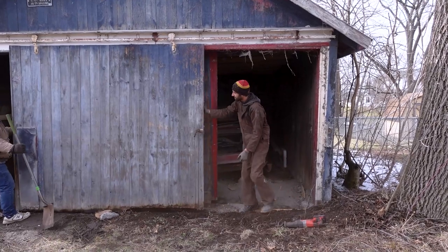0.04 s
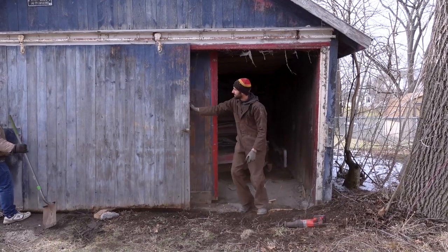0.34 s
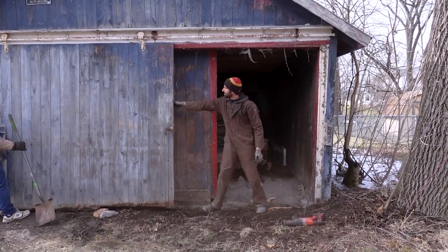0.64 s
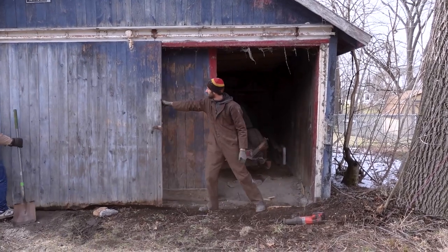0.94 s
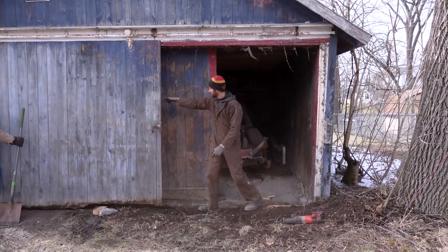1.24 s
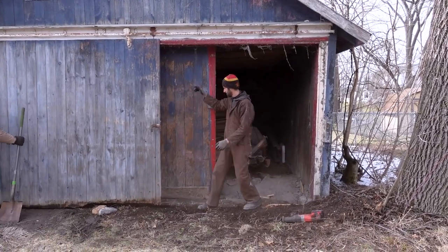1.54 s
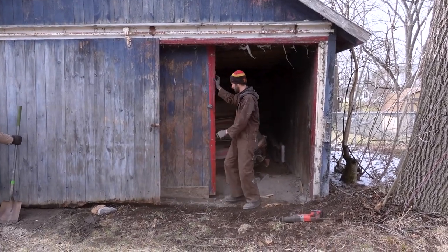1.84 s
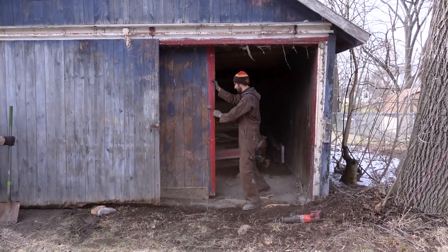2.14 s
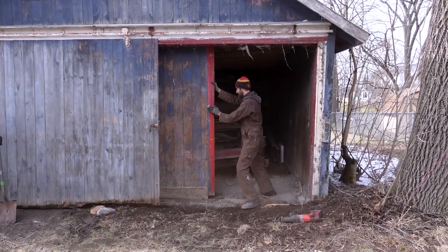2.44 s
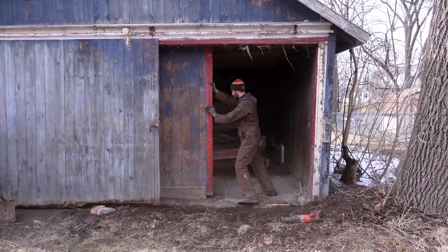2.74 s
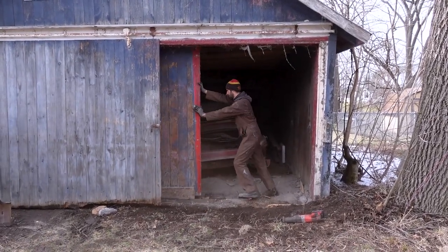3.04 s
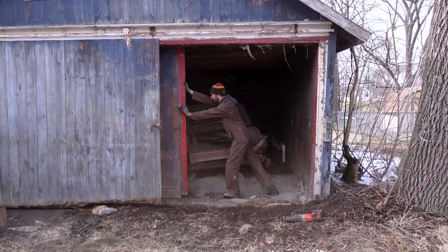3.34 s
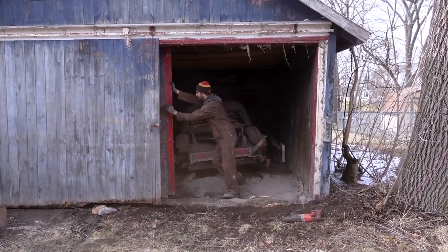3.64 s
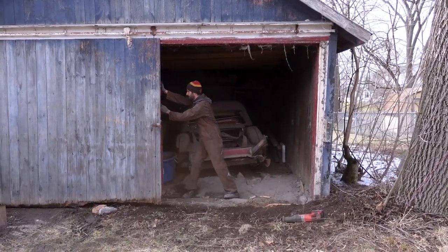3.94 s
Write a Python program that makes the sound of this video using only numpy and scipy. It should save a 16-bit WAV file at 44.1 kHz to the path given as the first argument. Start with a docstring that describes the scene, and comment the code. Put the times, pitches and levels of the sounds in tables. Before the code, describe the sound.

A heavy wooden barn door slides along its track, rumbling and scraping, its steel hangers clattering as it slows. After a pause with faint boot scuffs, it judders on and knocks against its stop, over a faint outdoor hum.

```python
"""Over a distant outdoor hum, a heavy plank barn door is pulled along its overhead track: the rollers
rumble through the booming planks and grind over rust, and the wood rasps on the wall. As the door
coasts to rest, its steel hangers clatter. In the pause, boots shift on the dirt and clothes swish.
Then the door is pushed on, juddering by stick-slip friction, until it knocks on its stop."""
import sys
import numpy as np
from scipy import signal
from scipy.fft import rfft, irfft
from scipy.io import wavfile
from scipy.ndimage import uniform_filter1d

SR = 44100
rng = np.random.default_rng(int(sys.argv[2]) if len(sys.argv) > 2 else 0)


def transcribe(signal):
    """Save signal, clipped to [-1, 1], as a 16-bit WAV file at the path in sys.argv[1]."""
    frames = np.atleast_2d(signal).T
    limited = np.clip(frames, -1, 1)
    pcm = np.round(limited * 32767).astype(np.int16)
    wavfile.write(sys.argv[1], SR, pcm)


N = 176400
T = np.arange(N) / SR


def amp(db):
    """Amplitude ratio of a level in decibels."""
    return 10 ** (np.asarray(db) / 20)


def unit(x):
    """Normalisation to rms 1."""
    return x / np.sqrt(np.mean(x ** 2) + 1e-20)


def read(points, hz):
    """Interpolation on a log-frequency axis."""
    f, value = np.transpose(points)
    return np.interp(np.log(hz + 1), np.log(f + 1), value)


def add(mix, s, sound):
    """Superposition of a sound starting at time s."""
    part = mix[max(0, round(s * SR)):][:len(sound)]
    part += sound[:len(part)]


def through(x, response):
    """Convolution with an impulse response."""
    return signal.fftconvolve(x, response)[:len(x)]


def colour(x, spectrum, size=8192):
    """Minimum-phase filtering to the given spectrum."""
    log_gain = np.log(amp(read(spectrum, abs(np.fft.fftfreq(size, 1 / SR)))))
    response = np.fft.ifft(np.exp(np.conj(signal.hilbert(log_gain)))).real
    return through(x, response[:size // 2])


def shelf(x, db, hz=1750):
    """First-order shelving: the treble above hz changes by db."""
    low = signal.lfilter(*signal.butter(1, hz, fs=SR), x)
    return low + amp(db) * (x - low)


def wander(hz):
    """Random fluctuation of rms 1, low-passed at hz."""
    rolloff = 1 + (np.fft.rfftfreq(N, 1 / SR) / hz) ** 4
    return unit(irfft(rfft(rng.standard_normal(N)) / rolloff, N))


def clicks(per_s, spread_db):
    """Shot noise: random tiny impacts, a few of them large."""
    size = amp(spread_db * np.minimum(rng.exponential(1, N), 4.5))
    return size * rng.choice([-1, 1], N) * (rng.random(N) < per_s / SR)


def ring(modes):
    """Free vibration: each mode is a damped sinusoid."""
    t = T[:SR // 2]
    return sum(amp(db - 60 * t / t60) * np.sin(2 * np.pi * hz * t) * rng.choice([-1, 1])
               for hz, db, t60 in modes)


def tail(t60s):
    """Diffuse decay of energy 1; t60s is one decay time or a table by frequency."""
    hz, t, noise = signal.stft(rng.standard_normal(SR // 2), SR, nperseg=128)
    t60 = read(t60s, hz)[:, None] if np.ndim(t60s) else t60s
    x = signal.istft(noise * amp(-60 * t / t60), SR)[1][:SR // 2]
    return x / np.linalg.norm(x)


def crack(t60s, spectrum):
    """Impact response of densely overlapping modes, with rms 1 at its start."""
    x = colour(tail(t60s), spectrum)
    return x / np.std(x[:SR // 100])


def travelling(x, t60s, paths_per_s, count=6):
    """Reflection paths change as a source moves: x crossfades through a cycle of diffuse decays."""
    place = T * paths_per_s
    distances = [(place - k + count / 2) % count - count / 2 for k in range(count)]
    return sum(through(x * np.cos(np.pi / 2 * np.clip(d, -1, 1)), tail(t60s)) for d in distances)


def bursts(rows):
    """Power sum of envelopes with exponential rise and decay, given as time constants."""
    return np.sqrt(sum((amp(db) * np.exp(-np.maximum((s - T) / rise, (T - s) / decay))) ** 2
                       for s, db, rise, decay in rows))


def swells(rows, waver, rough_db, waver_hz):
    """Tones with random frequency and amplitude modulation under Gaussian envelopes."""
    out = np.zeros(N)
    drift = np.cumsum(waver * wander(waver_hz)) / SR
    rough = amp(rough_db * wander(waver_hz))
    for s, db, hz, sigma in rows:
        near = abs(T - s) < 4 * sigma
        tone = unit(rough[near] * np.sin(2 * np.pi * (hz * (T + drift)[near] + rng.random())))
        out[near] += amp(db) * tone * np.exp(-.5 * ((T[near] - s) / sigma) ** 2)
    return out


# spectrum of the distant hum (frequency [Hz], level [dB])
HUM_SPECTRUM = [(20, -14), (35, 1), (55, -4), (105, 1.5), (200, -3.5), (380, -4.5), (600, -13.5),
                (1000, -15), (1450, -16), (2000, -24), (2800, -30), (3500, -23.5), (4500, -36.5),
                (7000, -45.5), (10000, -50), (16000, -50.5)]
HUM_DB, HUM_SWELL_DB = -43, .7

def outdoors():
    """Ambient noise: a far-off broadband hum whose level fluctuates slightly."""
    return amp(HUM_DB + HUM_SWELL_DB * wander(3.5)) * unit(colour(rng.standard_normal(N), HUM_SPECTRUM))


# swishes of cloth (peak time [s], level [dB], rise [s], decay [s])
CLOTH_SWISHES = [(2.555, -61.5, 0.11, .025), (3.235, -60, 0.037, .015)]
CLOTH_HZ = 6000

def clothes():
    """Sliding friction between work clothes gives high-passed noise."""
    hiss = signal.lfilter(*signal.butter(2, CLOTH_HZ, "high", fs=SR), rng.standard_normal(N))
    return unit(hiss) * bursts(CLOTH_SWISHES)


# scuffs of the soles (peak time [s], level [dB], rise [s], decay [s])
BOOT_SCUFFS = [(1.905, -51, 0.032, 0.019), (2.028, -44.5, 0.0072, 0.005), (2.14, -58, 0.11, 0.033),
               (2.33, -56, 0.089, 0.087), (2.53, -54.5, 0.13, 0.086), (2.9, -49, 0.093, 0.11),
               (3.245, -45.5, 0.05, 0.012), (3.337, -42.5, 0.0043, 0.021), (3.868, -39.5, 0.0061, 0.019)]
# spectrum of crunching dirt (frequency [Hz], level [dB])
DIRT_SPECTRUM = [(500, -4), (1500, 14.5), (3500, 12), (5000, 3.5), (8000, -4.5), (12000, -15), (16000, -26)]

def boots():
    """Granular noise: grains of dirt crunch under the soles."""
    return unit(colour(clicks(per_s=4300, spread_db=5), DIRT_SPECTRUM)) * bursts(BOOT_SCUFFS)


# rubs of the planks on the wall (peak time [s], level [dB], rise [s], decay [s])
WALL_RUBS = [(.64, -37.5, 0.17, 0.073), (.82, -32.5, 0.087, 0.12), (2.5, -43.5, .012, .028),
             (3.49, -39, 0.085, 0.077)]
# spectrum of rasping wood (frequency [Hz], level [dB])
RASP_SPECTRUM = [(300, -14), (700, 3), (1400, -1), (2200, -9.5), (3300, -7.5), (4300, -18.5), (5600, -25),
                 (7000, -34.5), (16000, -40)]

def rubbing():
    """Dry friction: wood fibres catch and slip on the wall."""
    return unit(colour(clicks(per_s=5000, spread_db=2), RASP_SPECTRUM)) * bursts(WALL_RUBS)


# runs of slips (time [s], duration [s], level [dB], slip rate [1/s], treble gain [dB])
SLIP_RUNS = [(2.481, .02, -41.5, 85, 2), (3.434, .06, -34, 72, -2), (3.56, .024, -37, 62, -12)]
# modes of the creaking boards (frequency [Hz], level [dB], T60 [s])
CREAK_MODES = [(583, -0.5, 0.15), (1327, 5, 0.052), (1430, -5, 0.09), (1836, -6, 0.13), (2200, -13, .1),
               (2480, -9, 0.082), (3330, -10, 0.059)]
SLIP_T60_S, SLIP_JITTER, CREAK_DB = .04, .12, -3

def juddering():
    """Stick-slip motion: the pushed door advances in quick, uneven jerks that ring its boards."""
    out = np.zeros(N)
    for s, length, db, per_s, treble_db in SLIP_RUNS:
        for delay in np.arange(0, length, 1 / per_s):
            slip = crack(SLIP_T60_S, RASP_SPECTRUM) + amp(CREAK_DB) * ring(CREAK_MODES)
            jitter = SLIP_JITTER * rng.standard_normal() / per_s
            add(out, s + delay + jitter, amp(db) * shelf(slip, treble_db))
    return out


COAST_S, COAST_SIGMA_S, COAST_HZ, COAST_FALL_OCT_PER_S, COAST_DB = 1.22, .065, 208, 3.6, -45

def coasting():
    """Frequency follows rolling speed: two rough roller tones, a fifth apart, sink as the door slows."""
    octaves = np.clip(COAST_FALL_OCT_PER_S * (COAST_S - T), -2, 2)
    hz = COAST_HZ * 2 ** octaves * (1 + .015 * wander(40))
    phase = 2 * np.pi * np.cumsum(hz) / SR
    groan = np.sin(phase) + amp(-1) * np.sin(1.5 * phase)
    return amp(COAST_DB) * unit(groan) * np.exp(-.5 * ((T - COAST_S) / COAST_SIGMA_S) ** 2)


# spectrum of steel striking steel (frequency [Hz], level [dB])
STEEL_SPECTRUM = [(500, -25), (1500, 3.5), (3200, 4.5), (5500, 0.5), (8500, -5.5), (12000, -9.5),
                  (16000, -17)]
# modes of the small hanger parts (frequency [Hz], level [dB], T60 [s])
HANGER_MODES = [(2565, -5, .08), (3240, -2, .07), (4240, -4, .08), (5200, -3, .08), (5755, -2, .1),
                (6610, -4, .08), (7170, -5, .08), (8227, -2, .085), (9300, -3, .07), (11900, -8, .08)]
CLINK_RISE_S, CLINK_T60_S, CLINK_RING_DB, CLINK_SPREAD_DB, CLINK_DETUNE = .003, .075, -6.5, 4, .04

def clink():
    """Impact excitation of steel: each tap favours other modes and shifts them a little."""
    partials = ring([(hz * (1 + CLINK_DETUNE * rng.standard_normal()),
                      db + CLINK_SPREAD_DB * rng.standard_normal(), t60) for hz, db, t60 in HANGER_MODES])
    rise = np.minimum(T[:SR // 2] / CLINK_RISE_S, 1)
    return rise * (crack(CLINK_T60_S, STEEL_SPECTRUM) + amp(CLINK_RING_DB) * partials)


# rattles of the hangers (peak time [s], level [dB], rise [s], decay [s])
HANGER_RATTLES = [(.385, -45.5, 0.015, 0.0068), (.812, -32, 0.015, 0.015), (.966, -36.5, 0.023, 0.028),
                  (1.09, -40.5, 0.031, 0.026), (1.135, -41.5, 0.0073, 0.047), (1.219, -29, 0.022, 0.0095)]
# single taps of the hangers (time [s], level [dB])
HANGER_TAPS = [(.311, -43.5), (.593, -52), (.723, -42), (.823, -34), (.892, -37), (0.911, -35.5),
               (.957, -47), (1.08, -39.5), (1.099, -40), (1.167, -37), (1.209, -44), (1.257, -43.5)]
# a hanger drops on the track and bounces (time [s], level [dB])
HANGER_DROPS = [(1.221, -26), (1.257, -46)]
# modes of the struck track (frequency [Hz], level [dB], T60 [s])
TRACK_MODES = [(1890, -10, .23), (2293, -12, .2), (2379, -10.5, .24), (3063, -5, .09), (3149, -2, .085),
               (3225, -8, .09), (3639, -11, .19), (5760, -11, .09)]
# modes of a squeaking roller axle (frequency [Hz], level [dB], T60 [s])
AXLE_MODES = [(10230, 1, .12), (10650, -2, 0.13), (14400, -5, .1), (15690, -3, .08)]
STEEL_T60_S, RATTLE_RING_DB, SQUEAK_S, SQUEAK_DB = .028, -22, .771, -44.5

def hangers():
    """Modal ringing of loose steel: the hangers rattle, clink and strike the track; an axle squeaks."""
    chatter = unit(colour(clicks(per_s=2600, spread_db=2.8), STEEL_SPECTRUM)) * bursts(HANGER_RATTLES)
    partials = ring(HANGER_MODES)
    out = travelling(chatter, STEEL_T60_S, paths_per_s=14.32)
    out += amp(RATTLE_RING_DB) * through(chatter, partials / np.linalg.norm(partials))
    for s, db in HANGER_TAPS:
        add(out, s, amp(db) * clink())
    clank = ring(TRACK_MODES)
    for s, db in HANGER_DROPS:
        add(out, s, amp(db) * clank)
    add(out, SQUEAK_S, amp(SQUEAK_DB) * ring(AXLE_MODES))
    return out


# swells of the door's low modes (peak time [s], level [dB], frequency [Hz], Gaussian sigma [s])
DOOR_BOOMS = [(0.07, -23, 93.3, 0.056), (.19, -25.5, 239.4, 0.092), (.22, -33, 135.3, 0.071),
              (0.327, -37, 90, 0.052), (.49, -26, 148, 0.018), (0.506, -22.5, 98.5, 0.053),
              (.53, -36.5, 231.7, 0.048), (.68, -30.5, 145.9, 0.063), (.7, -29, 244.6, 0.076),
              (.75, -22.5, 95.6, 0.047), (.95, -33.5, 92.4, 0.14), (3.167, -29, 84.1, 0.11),
              (3.19, -33, 233, 0.078), (3.35, -26, 235.8, 0.02), (3.57, -38, 205.6, 0.089),
              (3.793, -31.5, 83.1, 0.033), (3.84, -30.5, 212, 0.047), (3.915, -24.5, 82.3, 0.046)]
# thuds of the swaying door (time [s], level [dB], frequency [Hz])
SWAY_THUDS = [(2.541, -34.5, 50), (2.744, -20.5, 45.7), (2.879, -26, 55.7), (3.31, -27, 48),
              (3.473, -16, 55.4)]
THUD_RISE_S, THUD_T60_S = .02, .2

def booming():
    """Panel resonance: the moving door's low modes swell and fade, and its sway gives short thuds."""
    out = swells(DOOR_BOOMS, waver=.0217, rough_db=.9, waver_hz=23)
    t = T[:SR // 2]
    envelope = np.minimum(t / THUD_RISE_S, amp(-60 * (t - THUD_RISE_S) / THUD_T60_S))
    for s, db, hz in SWAY_THUDS:
        add(out, s, amp(db) * envelope * np.sin(2 * np.pi * hz * t))
    return out


# rollers crossing joints, hands on the door (time [s], level [dB], treble gain [dB])
SOFT_BLOWS = [(0.102, -31, -20), (0.312, -28, -2), (0.432, -41, 4), (0.506, -29.5, -4), (0.593, -23.5, -6),
              (.64, -33, -11), (.673, -28.5, -8), (.958, -29, 4.5), (2.193, -41.5, -1), (2.539, -44, 1),
              (2.796, -38.5, -5), (2.895, -34, -8), (2.927, -30, -17.5), (3.042, -32.5, -14),
              (3.333, -32, -17), (3.355, -32.5, -5)]
# spectrum of struck planks (frequency [Hz], level [dB])
WOOD_SPECTRUM = [(60, -10.5), (200, 7.5), (500, 1.5), (750, -7), (1000, 1), (1450, 2.5), (1900, -7.5),
                 (2400, -3.5), (2900, -15), (3600, -4), (4400, -22), (8000, -18), (16000, -29)]
# decay of the planks (frequency [Hz], T60 [s])
WOOD_DECAY = [(100, 0.31), (1000, .14), (3500, 0.083), (6000, 0.039), (15000, 0.013)]
# distinct modes of the planks (frequency [Hz], level [dB], T60 [s])
PLANK_MODES = [(947, -2, .1), (1130, -2, .11), (1308, -2, .15), (1400, 0, .07), (1486, 1, .09),
               (2234, -6, .14), (2412, -4, .14), (3600, -7, .1), (5500, -17, .11)]
# spectrum of the hard contact with the stop (frequency [Hz], level [dB])
SNAP_SPECTRUM = [(300, -22), (1400, 6), (2400, 3.5), (2900, 0), (3650, 9), (4400, -10), (5600, -11),
                 (8000, -17), (16000, -23)]
KNOCK_RISE_S, KNOCK_RING_DB = .003, -25
STOP_S, SNAP_T60_S, STOP_SNAP_DB, STOP_CRACK_DB, STOP_RING_DB = 3.936, .082, -22.5, -24.5, -27.5

def knocks():
    """Impulse response of the planks: soft blows along the way, then a hard one at the stop."""
    out = np.zeros(N)
    rise = np.minimum(T[:SR // 2] / KNOCK_RISE_S, 1)
    for s, db, treble_db in SOFT_BLOWS:
        blow = crack(WOOD_DECAY, WOOD_SPECTRUM) + amp(KNOCK_RING_DB) * ring(PLANK_MODES)
        add(out, s, amp(db) * shelf(rise * blow, treble_db))
    add(out, STOP_S, amp(STOP_SNAP_DB) * crack(SNAP_T60_S, SNAP_SPECTRUM))
    add(out, STOP_S, amp(STOP_CRACK_DB) * crack(WOOD_DECAY, WOOD_SPECTRUM))
    add(out, STOP_S, amp(STOP_RING_DB) * ring(PLANK_MODES))
    return out


# course of the pull and the push (time [s], rumble level [dB], grinding level [dB])
ROLL_LEVELS = [(0, -27.5, -24.5), (.2, -26.5, -29), (.39, -31, -30), (.47, -21.5, -31), (.68, -28, -26.5),
               (.85, -27, -33.5), (1.0, -32.5, -29.5), (1.09, -34.5, -37.5), (1.16, -47, -45.5),
               (1.27, -44.5, -44.5), (1.4, -48, -104), (2.68, -76, -47), (2.81, -33.5, -42.5),
               (2.86, -37.5, -39), (2.91, -28, -33), (3.07, -30.5, -34.5), (3.16, -25, -32),
               (3.29, -26, -34.5), (3.38, -26, -32.5), (3.48, -27, -34.5), (3.55, -25, -37.5),
               (3.77, -31, -37), (3.88, -27.5, -35), (4, -33, -25.5)]
# spectrum of the planks under the rollers (frequency [Hz], level [dB])
RUMBLE_SPECTRUM = [(20, -29), (45, -26), (70, -9), (95, 0.5), (115, -3.5), (150, 0.5), (185, -2),
                   (240, -1.5), (300, -3), (400, -12.5), (600, -20.5), (1200, -29.5), (4000, -109.5)]
# spectrum of crushed rust and grit (frequency [Hz], level [dB])
RUST_SPECTRUM = [(100, 10), (300, -4), (520, 3), (850, -2.5), (1100, -5), (1450, -6.5), (2000, -12),
                 (2800, -16), (3500, -15), (4400, -24.5), (6500, -31.5), (10000, -37.5), (16000, -45.5)]
# squeals of steel slipping on steel (peak time [s], level [dB], frequency [Hz], Gaussian sigma [s])
SLIP_SQUEALS = [(.265, -41, 2416, .005), (.273, -36.5, 1650, .004), (.65, -39.5, 923, .02),
                (.69, -29.5, 534, .036), (3.452, -38, 1290, .02), (3.47, -37.5, 755, .035)]
STEADY_S, STEADY_SHARE = .037, .94
GRIT_T60_S, JUDDER_DB, JUDDER_HZ = .03, 1, 45
PUSH_FROM_S, PUSH_DULL_HZ, PUSH_TREBLE_DB = 2.0, 1680, -5.5

def rolling():
    """Roughness excitation: rollers bump along the track, shake the planks, crush rust and squeal."""
    s, rumble_db, grind_db = np.transpose(ROLL_LEVELS)
    rumble = unit(colour(clicks(per_s=900, spread_db=2.5), RUMBLE_SPECTRUM))
    power = abs(uniform_filter1d(rumble ** 2, int(STEADY_S * SR))) + 1e-6
    rumble = unit(rumble / power ** (STEADY_SHARE / 2))  # keeps the rumble fairly even
    grit = clicks(per_s=2400, spread_db=2.3) * amp(JUDDER_DB * wander(JUDDER_HZ))
    reflections = travelling(grit, GRIT_T60_S, paths_per_s=70.13, count=14)
    grind = unit(colour(grit + reflections, RUST_SPECTRUM))
    grind = shelf(grind, PUSH_TREBLE_DB * (T > PUSH_FROM_S), PUSH_DULL_HZ)  # duller further along
    squeal = swells(SLIP_SQUEALS, waver=.038, rough_db=6.5, waver_hz=118.5)
    return rumble * amp(np.interp(T, s, rumble_db)) + grind * amp(np.interp(T, s, grind_db)) + squeal


# reverberation of the open barn (frequency [Hz], T60 [s])
BARN_DECAY = [(100, 0.24), (1000, 0.26), (4000, 0.33), (15000, 0.1)]
BARN_DB = -13

def scene():
    """Superposition of the direct sound, its reverberation, the door's boom and the distant hum."""
    direct = rolling() + rubbing() + juddering() + coasting() + hangers() + knocks() + boots() + clothes()
    reverberation = amp(BARN_DB) * travelling(direct, BARN_DECAY, paths_per_s=5.11)
    return (direct + reverberation + booming() + outdoors())[None]


LOW_CUT_HZ, HIGH_CUT_HZ = 42, 15850

def record(dry):
    """Band limiting: the microphone rolls off the bass and a steep low-pass ends the treble."""
    cut = signal.lfilter(*signal.butter(2, LOW_CUT_HZ, "high", fs=SR), dry)
    low_pass = signal.firwin(511, HIGH_CUT_HZ, window=("kaiser", 9), fs=SR)
    return signal.oaconvolve(cut, low_pass[None], "same")


dry = scene()
out = record(dry)
transcribe(out)
```